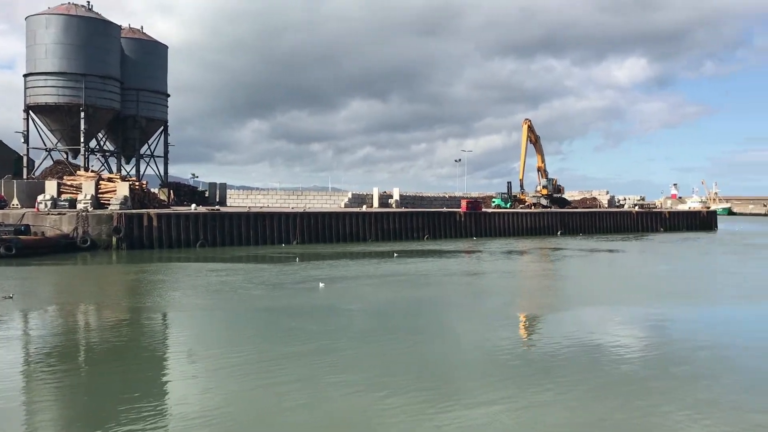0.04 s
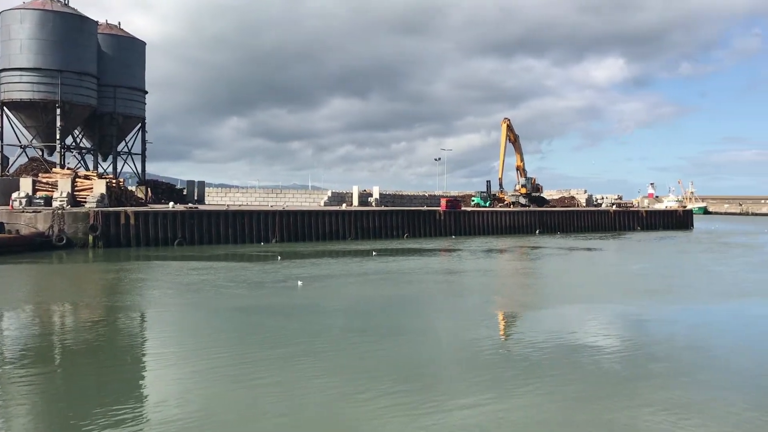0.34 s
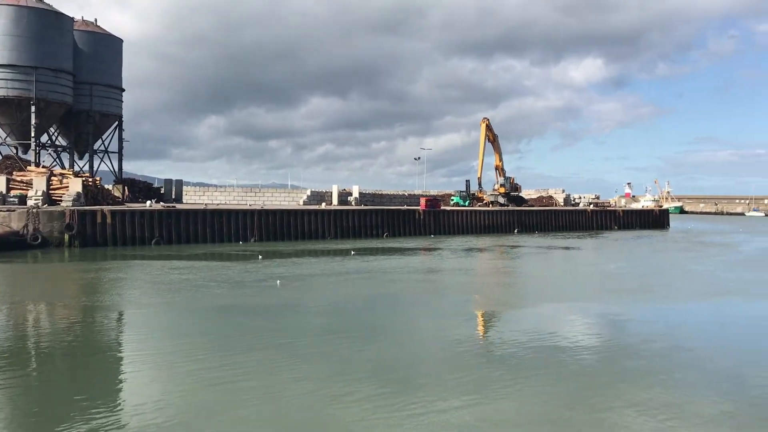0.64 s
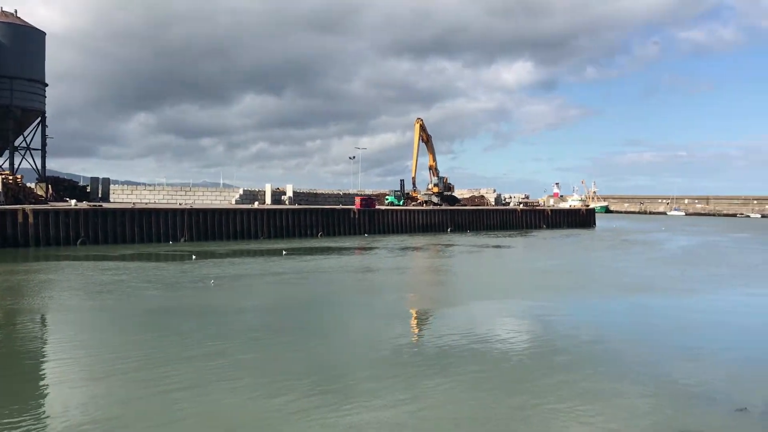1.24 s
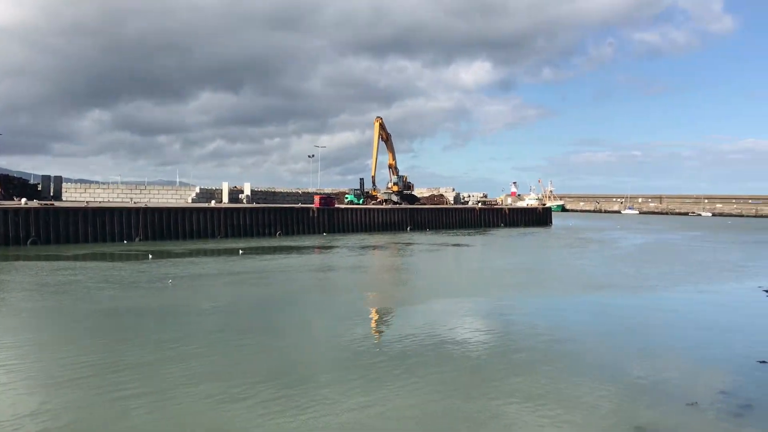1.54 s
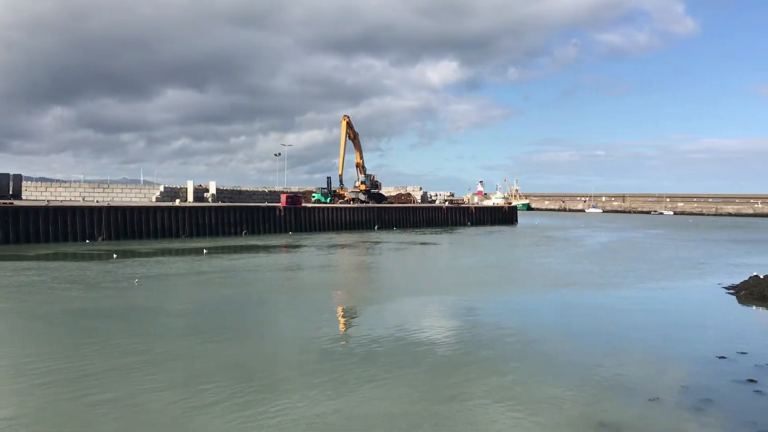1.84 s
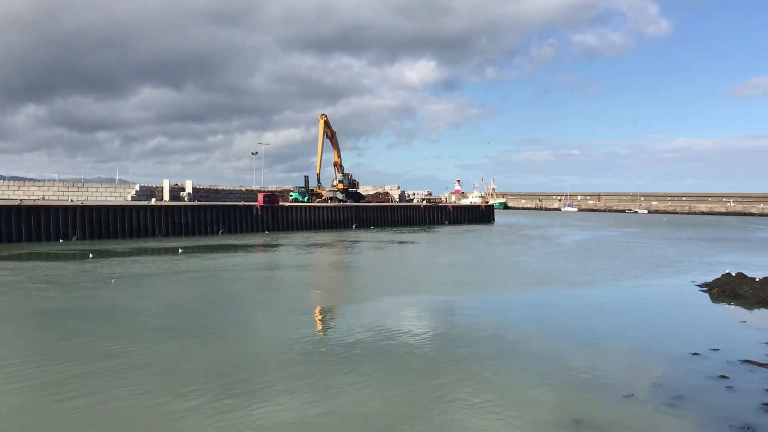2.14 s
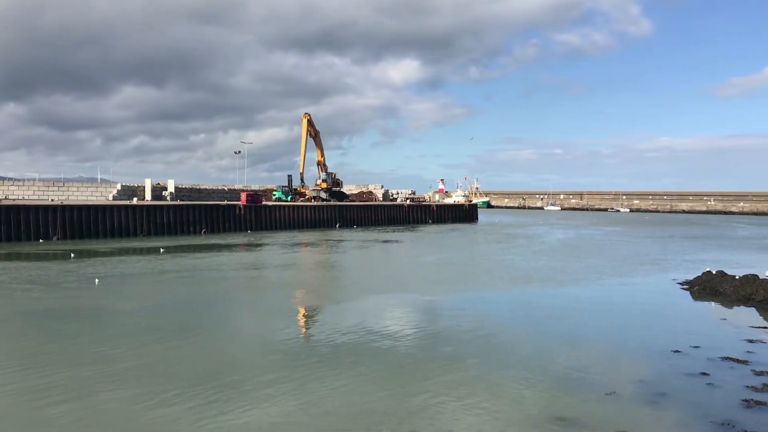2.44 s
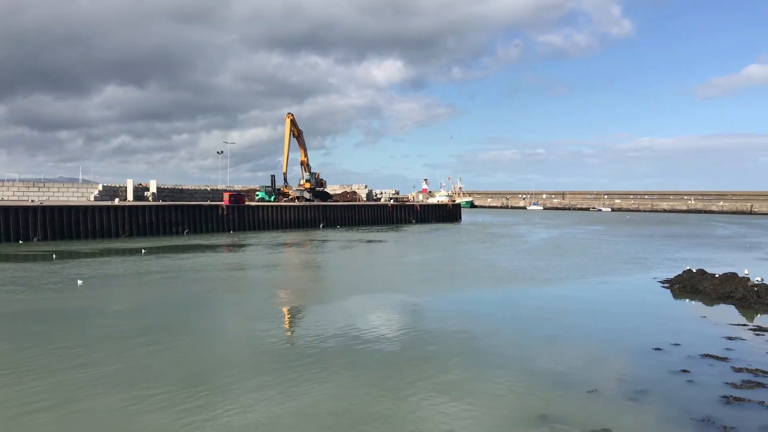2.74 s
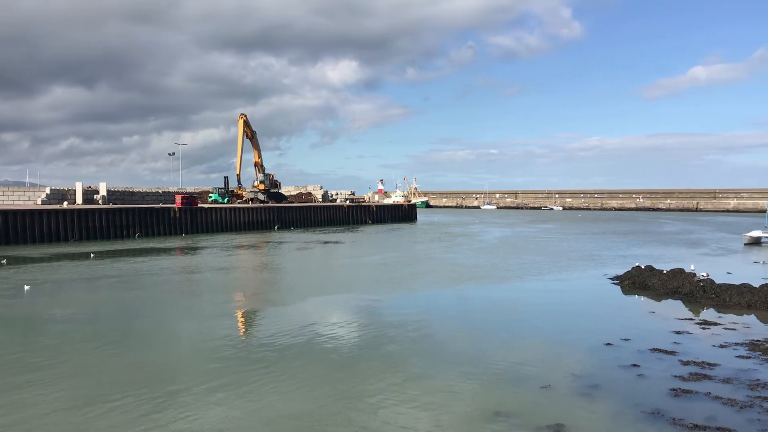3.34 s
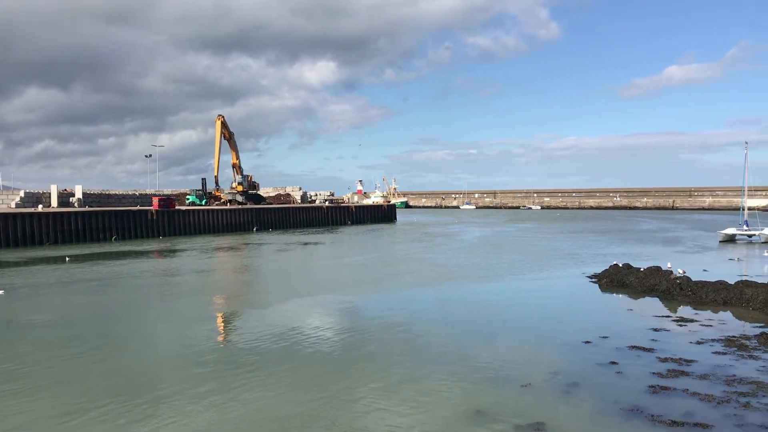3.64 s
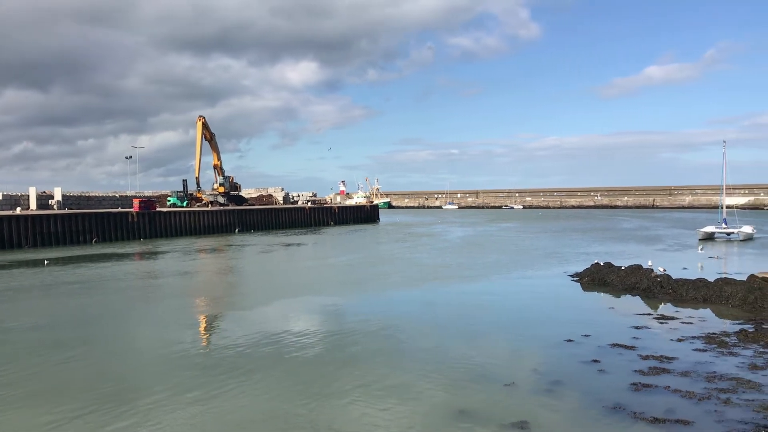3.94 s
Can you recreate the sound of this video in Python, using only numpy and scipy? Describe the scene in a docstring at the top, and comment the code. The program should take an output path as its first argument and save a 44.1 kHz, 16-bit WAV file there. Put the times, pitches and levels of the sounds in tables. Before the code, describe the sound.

A rope slaps a hollow metal mast in bright, uneven clinks that echo off a harbour quay and grow faint. Behind them a gust eases over water wash and distant engine hum, while birds whistle thinly.

```python
"""On the quay of a windy harbour. A gust eases over the wash of air and water and the hum of distant
diesels, while a halyard slaps a hollow metal mast, chattering briefly at each blow; the quay echoes it.
Thin falling whistles, probably seabirds, reach the microphone from far off. Just after one second
something knocks dully. At three seconds a nearer bird calls, and the halyard's blows grow faint."""
import sys
import numpy as np
from scipy import signal
from scipy.fft import rfft, irfft
from scipy.io import wavfile
from scipy.ndimage import uniform_filter1d

SR = 44100
rng = np.random.default_rng(int(sys.argv[2]) if len(sys.argv) > 2 else 0)


def put_to_file(sound):
    """Save the sound as 16-bit audio at rate SR, in the file named by the first command-line argument."""
    columns = np.atleast_2d(sound).T  # one column per channel
    safe = np.clip(columns, -1, 1)
    whole_steps = np.round(safe * 32767)
    wavfile.write(sys.argv[1], SR, whole_steps.astype(np.int16))


N = 176400
RING_HZ = 3100  # the mast's main ring


def halyard():
    """The rope slaps the mast at uneven intervals, the clearest sound at the microphone."""
    # start_s, main_db, upper_db, top_db, rattle_db, chatter_s
    blows = [(0.0277, -44.5, -64, -78, -73, 0.003), (0.0862, -46.5, -60, -63.5, -59.5, 0.0043),
             (0.448, -47, -67, -69, -62, 0.0054), (0.462, -43.5, -55.5, -70, -56, 0.011),
             (0.51, -52, -63, -86, -62, 0.0059), (0.5678, -41.5, -63, -78, -57.5, 0.007),
             (0.811, -30, -50.5, -48, -58, 0.0097), (0.861, -48, -57.5, -72, -67, 0.0084),
             (1.117, -38.5, -53.5, -72, -55, 0.011), (1.178, -41, -68, -56.5, -57, 0.019),
             (1.5315, -32, -48.5, -50, -54.5, 0.004), (1.544, -33, -47.5, -58, -64, 0.004),
             (1.5514, -37.5, -59, -72, -80, 0.0047), (1.674, -57, -68, -71, -66, 0.0095),
             (1.912, -37.5, -56, -56, -57.5, 0.0089), (2.224, -36.5, -67, -64, -69, 0.0075),
             (2.2753, -48.5, -65, -70, -66, 0.0072), (2.643, -46.5, -58.5, -72, -59, 0.012),
             (2.7938, -46, -69.5, -79, -65, 0.004), (2.83, -62, -66, -80, -75, 0.003),
             (3.005, -50, -70, -69, -66, 0.019), (3.38, -54, -71, -82, -72, 0.016),
             (3.665, -74, -78, -78, -76, 0.002)]
    out, lead_s = np.zeros(N), 0.0015
    for start_s, *blow in blows:
        add(out, start_s - lead_s, mast_clink(*blow))
    return out


def mast_clink(main_db, upper_db, top_db, rattle_db, chatter_s):
    """A snap and a flurry of dying rebounds ring the mast, while the fittings rattle."""
    # bending modes: pitch_hz, gain_db, t60_s, ring (rounded, an index into ring_db)
    mast_modes = [(562, -18.5, 0.2, 0), (1613, -18, 0.084, 0.5), (RING_HZ, -6.5, 0.11, 0),
                  (3173, -13.5, 0.12, 1), (3290, -18.5, 0.068, 0), (5044, -1, 0.053, 1),
                  (5410, -6, 0.015, 3), (7450, -10, 0.05, 2), (10100, -25.5, 0.04, 2)]
    # spectra of the fittings and of the snap: frequency_hz, relative_db
    rattle_spectrum = [(1000, -5), (2200, 3.5), (3200, 11.5), (4200, -2), (5400, 0.5), (6500, -9),
                       (8500, -19), (11000, -23), (15000, -23)]
    snap_spectrum = [(2000, 2), (3500, 10.5), (8000, -2.5), (11000, -21), (13000, -21), (15000, -33)]
    t = np.arange(SR // 3) / SR
    contacts_per_s = 1600
    contacts = rng.standard_normal(len(t)) * (rng.random(len(t)) < contacts_per_s / SR)
    contacts *= np.exp(-t / chatter_s)
    contacts[0] = 1  # the blow itself
    out = amp(rattle_db + 1.5) * burst(rattle_spectrum, t, t60_s=0.15)
    out += amp(top_db - 3) * burst(snap_spectrum, t, t60_s=0.05)
    ring_db = (main_db, upper_db, top_db, rattle_db)
    for hz, gain_db, t60_s, ring in mast_modes:
        mode = onset(t) * np.sin(2 * np.pi * hz * t) * decay(t, t60_s)
        ringing = signal.fftconvolve(contacts, mode)[:len(t)]
        out += amp(gain_db + ring_db[round(ring)]) * blow_level(ringing)
    return out


def knock():
    """A short dull clatter with no ring."""
    # start_s, level_db
    hits = [(1.047, -50), (1.192, -39.5), (1.200, -42.5), (1.213, -44)]
    # frequency_hz, relative_db
    spectrum = [(120, 12), (300, 2), (600, -4), (1100, 1), (1600, 2), (2200, -6.5), (2800, -17.5),
                (4000, -21), (7800, -57)]
    out, t = np.zeros(N), np.arange(SR // 4) / SR
    for start_s, db in hits:
        add(out, start_s, amp(db) * burst(spectrum, t, t60_s=0.057))
    return out


def quay_echo(direct):
    """Adds a smeared echo off the quay and a long thin tail of scattered reflections."""
    t = np.arange(SR) / SR
    echo_s, spread_s, reflections_per_s = 0.184, 0.011, 2000
    tail_taps, quay_taps = rng.standard_normal((2, SR)) * (rng.random((2, SR)) < reflections_per_s / SR)
    tail = tail_taps * decay(t, t60_s=1.5) * (t > 0.02)
    echo = quay_taps * np.exp(-t / spread_s)
    response = amp(-18.5) * tail / np.linalg.norm(tail)
    add(response, echo_s, amp(-19) * echo / np.linalg.norm(echo))
    return direct + signal.fftconvolve(direct, response)[:N]


def birds():
    """Far glides reach the microphone blurred by reflections; one nearer bird calls in clear notes."""
    # start_s, length_s, start_hz, end_hz, level_db, direct_share
    far_glides = [(0.247, .03, 2360, 2280, -62, 0.6), (0.28, .12, 2310, 2220, -61, 0.25),
                  (0.48, .22, 2290, 2230, -64, 0.2), (0.517, 0.26, 4880, 4600, -72.5, 0.13),
                  (0.596, 0.26, 3050, 2940, -61.5, 0.08), (0.904, .33, 4176, 4086, -72, 0.75),
                  (0.915, 0.05, 2980, 2730, -65, 0.85), (3.75, 0.24, 3180, 3210, -73, 0.82)]
    # three notes (a rise, a high dip, a long stepped fall), points of: time_s, pitch_hz, level_db
    near_notes = [
        [(3.015, 4000, -73), (3.045, 4020, -64), (3.07, 4140, -68)],
        [(3.065, 4680, -76), (3.1, 4610, -67), (3.118, 4430, -67), (3.145, 4400, -77)],
        [(3.118, 3870, -67), (3.16, 3945, -65.5), (3.255, 3954, -70), (3.35, 3696, -72.5), (3.405, 3770, -66),
         (3.47, 3570, -72.5), (3.6, 3610, -81)],
    ]
    direct, scattered = np.zeros((2, N))
    for start_s, length_s, start_hz, end_hz, db, direct_share in far_glides:
        t = np.arange(0, length_s, 1 / SR)
        hz = start_hz + (end_hz - start_hz) * t / length_s
        blur = 0.003 + 0.022 * (1 - direct_share) ** 2
        call = whistle(t, hz, db - 4.5 * t / length_s, waver=blur)
        add(direct, start_s, direct_share * call)
        add(scattered, start_s, call)
    for note in near_notes:
        times, hz, db = np.transpose(note)
        t = np.arange(times[0], times[-1], 1 / SR)
        call = whistle(t - times[0], np.interp(t, times, hz), np.interp(t, times, db), waver=0.0013)
        add(direct, times[0], call)
        add(scattered, times[0], amp(-1) * call)
    tail = rng.standard_normal(SR) * decay(np.arange(SR) / SR, t60_s=0.7)
    return direct + amp(-2.5) * signal.fftconvolve(scattered, tail / np.linalg.norm(tail))[:N]


def whistle(t, hz, db, waver):
    """One thin note with soft ends, wavering in level and around its pitch curve."""
    fade_s = 0.011
    ends = np.clip(np.minimum(t, t[-1] - t) / fade_s, 0, 1)
    level = amp(db + 0.51 * drift(t, top_hz=44))
    pitch_hz = hz * (1 + waver * drift(t, top_hz=59.4))
    return ends * level * unit(np.sin(2 * np.pi * np.cumsum(pitch_hz) / SR))


def wind_and_water():
    """A gust eases over the steady wash of the harbour."""
    # time_s, level_db
    gust_curve = [(0, -45.5), (.35, -46), (.7, -48.5), (1.198, -49.5), (1.601, -54), (2.6, -55), (4, -56.5)]
    # spectra of the gust and of the steady air and water: frequency_hz, relative_db
    gust_spectrum = [(40, -26), (120, -7.5), (220, 3), (380, -11.5), (570, -8), (760, -18), (1050, -11.5),
                     (1600, -12.5), (1950, -22.5), (2400, -26), (2800, -35.5), (5000, -41), (9000, -65)]
    wash_spectrum = [(15, -34), (25, -3), (49, -2), (75, -1.5), (126, -9), (169, -22), (204, -14),
                     (253, -9.5), (399, -22), (614, -23.5), (782, -22.5), (1080, -27.5), (1620, -21),
                     (2770, -35.5), (3090, -31), (3440, -38.5), (4750, -45), (15500, -54)]
    gust_db = np.interp(np.arange(N) / SR, *np.transpose(gust_curve))
    gust = amp(gust_db) * air(gust_spectrum, patchy_db=1.5, flicker_db=1.58)
    wash = amp(-53) * air(wash_spectrum, patchy_db=0, flicker_db=1)
    return gust + wash


def engines():
    """A diesel and a generator hum in the distance."""
    # shaft_multiple, level_db
    diesel_lines = [(2, -47.5), (3.5, -56), (4, -65.5), (5, -59), (5.5, -70), (6, -56), (9.5, -67)]
    generator_lines = [(1.198, -71), (3, -52.5), (4, -60)]
    return engine_hum(diesel_lines, shaft_hz=27.27) + engine_hum(generator_lines, shaft_hz=26)


def engine_hum(lines, shaft_hz):
    """Low tones locked to a shaft turning at almost steady speed."""
    t = np.arange(N) / SR
    turns = shaft_hz * t + 0.0077 * drift(t, top_hz=0.722)
    return sum(amp(db) * unit(np.sin(2 * np.pi * (k * turns + rng.random()))) for k, db in lines)


def air(spectrum, patchy_db, flicker_db):
    """Coloured noise with drifting patches and a quick flicker shared by all bands."""
    hz = np.fft.rfftfreq(2048, 1 / SR)
    real, imag, patches = rng.standard_normal((3, N // 512 + 5, len(hz)))
    patches = uniform_filter1d(patches, size=7, axis=0)  # smooth in time
    patches = unit(uniform_filter1d(patches, size=14, axis=1))  # and in frequency
    flicker = rng.standard_normal((len(real), 1))
    db = spectrum_db(spectrum, hz) + patchy_db * patches + flicker_db * flicker
    frames = (real + 1j * imag) * amp(db) * (hz > 25)
    return unit(signal.istft(frames.T, nperseg=2048, noverlap=1536)[1][:N])


def burst(spectrum, t, t60_s):
    """Shaped noise for many close modes dying together."""
    colour = amp(spectrum_db(spectrum, np.fft.rfftfreq(len(t), 1 / SR)))
    noise = irfft(rfft(rng.standard_normal(len(t))) * colour, len(t))
    return blow_level(noise * onset(t) * decay(t, t60_s))


def onset(t, rise_s=0.0013):
    """The short smooth rise of a softened contact."""
    return 1 - np.exp(-(t / rise_s) ** 2)


def decay(t, t60_s):
    """Falls by 60 dB in t60_s."""
    return np.exp(-np.log(1000) * t / t60_s)


def blow_level(x, blow_s=0.013):
    """Scales a hit so that its energy, spread over one blow, has rms 1."""
    return x / np.sqrt(np.sum(x ** 2) / (blow_s * SR) + 1e-20)


def drift(t, top_hz):
    """A smooth random wander of rms about 1."""
    hz = top_hz * np.geomspace(1 / 10, 1, num=16)
    return np.sin(2 * np.pi * (hz[:, None] * t + rng.random((len(hz), 1)))).sum(0) / np.sqrt(len(hz) / 2)


def spectrum_db(points, hz):
    """Reads a spectrum on a log-frequency axis."""
    point_hz, db = np.transpose(points)
    return np.interp(np.log(hz + 1), np.log(point_hz), db)


def amp(db):
    """Decibels to gain."""
    return 10 ** (np.asarray(db) / 20)


def unit(x):
    """Scales to rms 1."""
    return x / np.sqrt(np.mean(x ** 2) + 1e-20)


def add(mix, start_s, sound):
    """Mixes a sound in at start_s."""
    part = mix[max(round(start_s * SR), 0):][:len(sound)]
    part += sound[:len(part)]


def scene():
    """One microphone on the quay: halyard, knock and birds over wind, water and engines."""
    return (quay_echo(halyard() + knock()) + birds() + wind_and_water() + engines())[None]


def record(dry):
    """The recorder's band limit cuts the highest treble."""
    lowpass = signal.firwin(511, cutoff=15720, window=("kaiser", 9), fs=SR)
    padded = np.pad(dry, ((0, 0), (255, 255)), mode="reflect")
    return signal.oaconvolve(padded, lowpass[None], "valid")


dry = scene()
out = record(dry)
put_to_file(out)
```